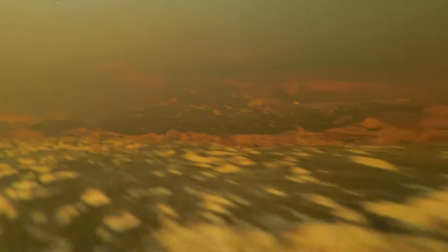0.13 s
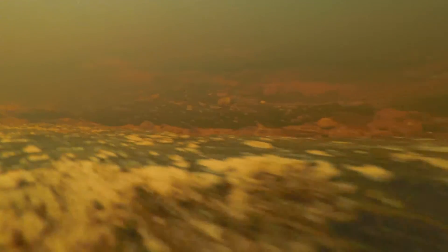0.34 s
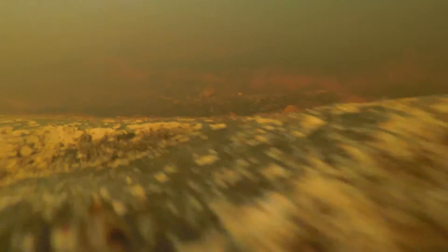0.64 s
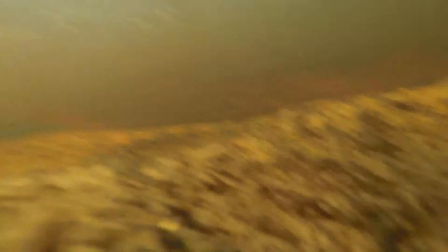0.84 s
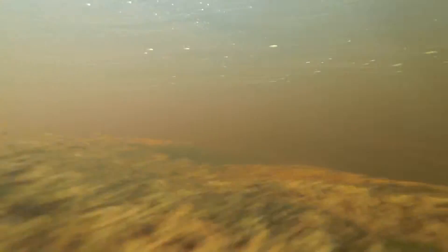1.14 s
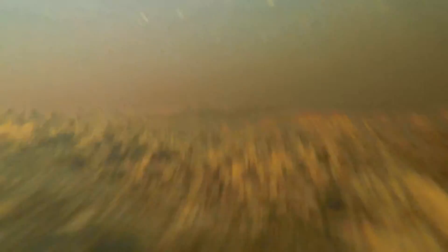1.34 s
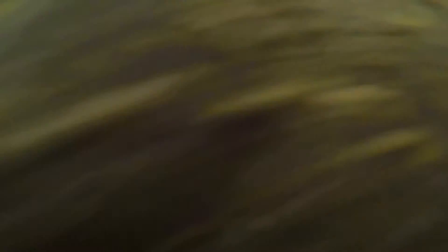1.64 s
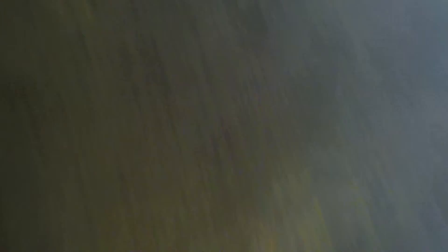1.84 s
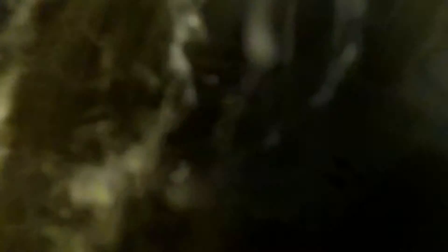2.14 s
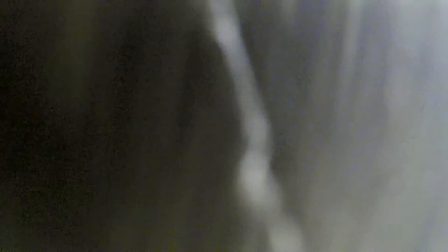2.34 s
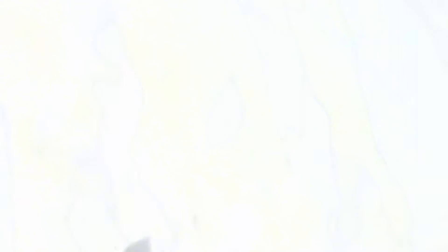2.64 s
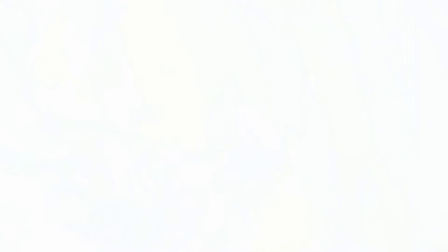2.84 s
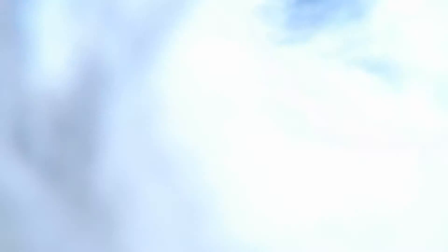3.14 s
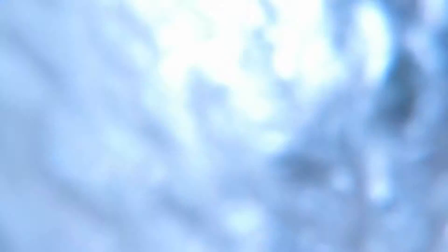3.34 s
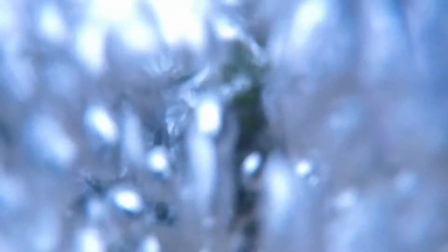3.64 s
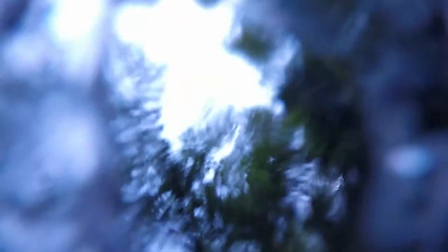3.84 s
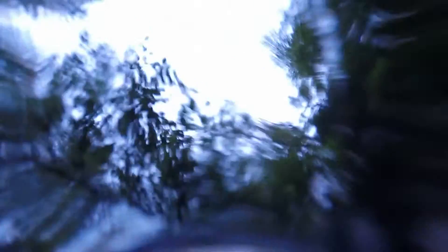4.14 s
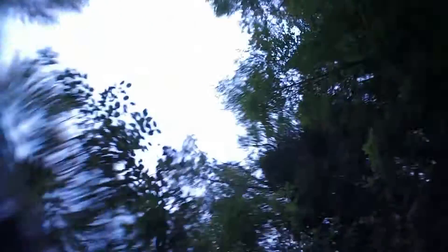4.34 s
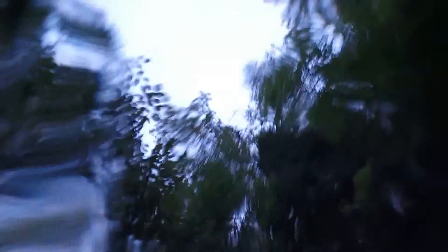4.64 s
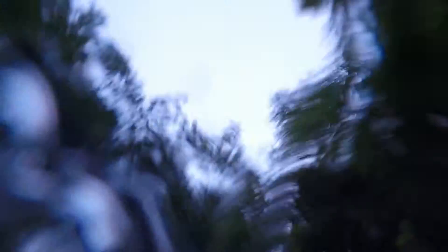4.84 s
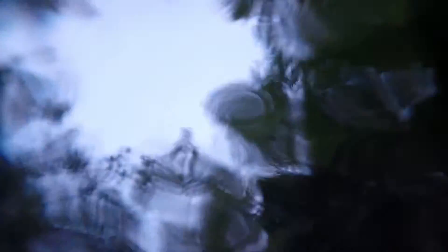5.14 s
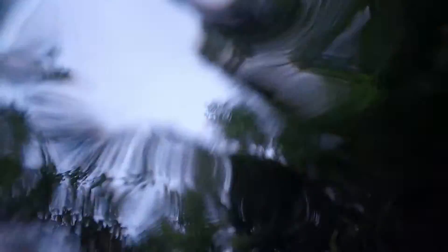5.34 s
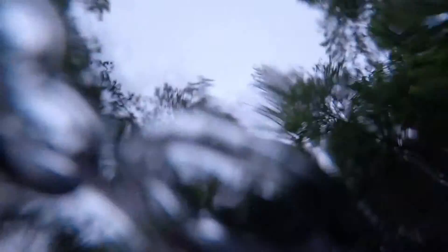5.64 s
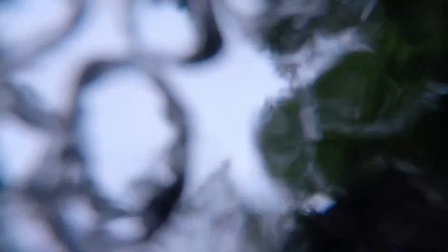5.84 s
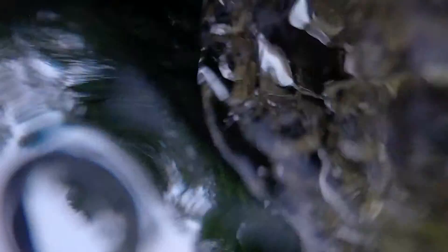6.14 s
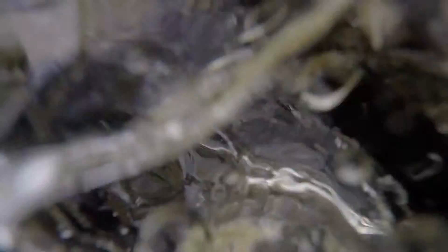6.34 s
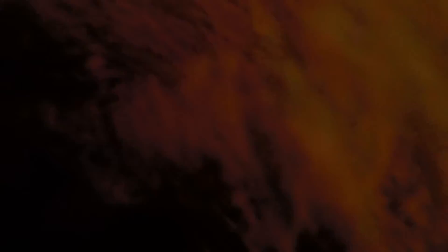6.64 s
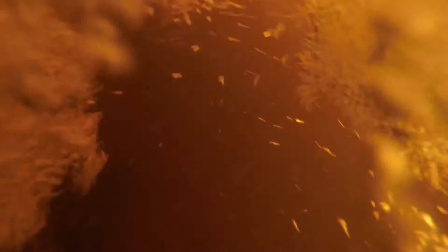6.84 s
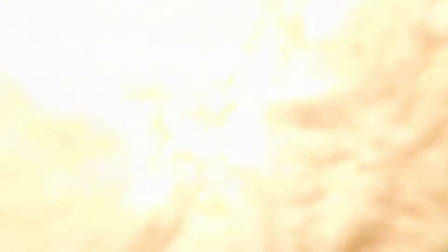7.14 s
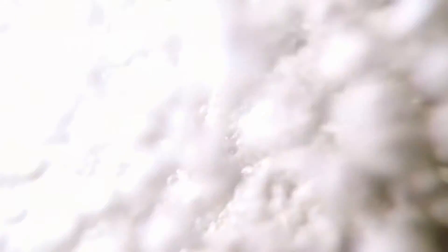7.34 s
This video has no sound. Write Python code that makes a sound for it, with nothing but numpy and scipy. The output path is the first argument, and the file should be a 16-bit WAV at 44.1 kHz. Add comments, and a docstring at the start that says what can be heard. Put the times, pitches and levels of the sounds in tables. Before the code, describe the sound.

Hard hollow knocks and plastic clacks batter a drifting waterproof case, rattling ever faster over muffled river hush, then fizzing white water and rumbling rapids.

```python
"""Stones knock the waterproof case of a camera that drifts down a river, strikes the bed and tumbles on.
Each blow mixes short, damped swings with bursts of filtered noise, and sets the mount humming.
Under the knocks lie the muffled hush of the river, made of shaped noise, and fizzing white water,
made of noise and many small bubble tones. At last comes a rapid, whose turbulence buffets the case.
The loudest blows overload the microphone."""
import sys
import numpy as np
from scipy.fft import rfft, irfft, next_fast_len
from scipy.io import wavfile
from scipy.ndimage import map_coordinates

SR = 44100
rng = np.random.default_rng(int(sys.argv[2]) if len(sys.argv) > 2 else 0)


def generate_wav(sig):
    """Save sig (samples, or channels by samples) to the path in sys.argv[1] as 16-bit PCM at SR."""
    pcm = np.round(np.clip(np.atleast_2d(sig).T, -1, 1) * 32767).astype(np.int16)
    wavfile.write(sys.argv[1], SR, pcm)


N = 330750  # length of the scene in samples

# Blows of stones on the case; each level sets one part of the blow against the same part of the others:
# start_s [s], thud_hz [Hz], thud_db [dB], clack_db [dB], crack_db [dB], hum_db of the mount [dB]
BLOWS = [(0.608, 777, -0.5, -7, -8, -16), (0.893, 332, 3.5, 1, -4, -15.5),
         (1.232, 278, -7.5, 0, -11.5, -16.5), (1.388, 269, -5, -12.5, -17.5, -14),
         (1.391, 278, -21, -7, -13.5, -11.5), (1.483, 389, 11.5, 5.5, -16, -15),
         (1.573, 328, 6.5, -1, -12.5, -21), (1.605, 206, -2.5, -26, -51, -20),
         (1.661, 800, -12, -29, -45, -17), (1.671, 231, 4, -12.5, -24, -12.5),
         (1.729, 560, -7, -13.5, -26, -13.5), (2.014, 835, -24, -9, -22, -22),
         (2.055, 222, 8.5, 9, -7.5, -21), (2.18, 324, 6.5, 3, -7.5, -27), (2.221, 546, 0.5, -6, -7, -23),
         (2.387, 275, 1.5, 1, -8.5, -23), (2.399, 307, 5, -16, -31, -17), (2.51, 278, -1.5, -3.5, -15, -17),
         (2.589, 796, 2, -13.5, -45, -26), (2.602, 580, -1.5, -9, -29, -16),
         (2.633, 640, -1.5, -20, -36, -18.5), (2.666, 307, 12, -6.5, -6, -17),
         (2.783, 655, 10.5, 7, -16.5, -28), (2.885, 515, -2, -6, -44, -44),
         (2.894, 624, -0.5, 4, -6, -27.5), (3.151, 136, -5.5, -4.5, -3, -37),
         (3.159, 560, -9, 3.5, -1.5, -45), (3.198, 644, -5, -5.5, -10.5, -29),
         (3.246, 243, -13, -4, -32, -25.5), (3.396, 320, -17.5, -7.5, -26, -27),
         (3.405, 295, 11.5, 1.5, -4, -32), (3.493, 384, 1, -8.5, -17, -8),
         (3.505, 383, -0.5, -11.5, -27, -9), (3.529, 382, 1.5, -18, -32.5, -14),
         (3.567, 330, -4.5, -18, -31, -26), (3.616, 420, 5.5, -16.5, -30.5, -16),
         (3.711, 350, 5, -10.5, -27, -6), (3.721, 490, -2.5, -21.5, -40, -23),
         (3.768, 488, -1.5, -21, -49, -10), (3.814, 348, 10.5, -10, -24, -20),
         (3.925, 544, -4, -10, -21, -0.5), (3.937, 480, 0.5, -13, -22, -14.5),
         (4.013, 830, -2, -11.5, -25, -3), (4.029, 770, -1, -16.5, -23, -15),
         (4.063, 400, 2, -18, -25, -17.5), (4.116, 720, -7.5, -13, -25, -5.5),
         (4.129, 490, -6.5, -14, -29, -6), (4.141, 730, -11, -28, -50, -11.5),
         (4.179, 400, 1, -16.5, -35, -14), (4.22, 560, -3.5, -17, -31, -10.5),
         (4.277, 554, -14, -26.5, -54, -5.5), (4.291, 660, -16, -43, -49, -13.5),
         (4.312, 398, 7.5, -14.5, -25.5, -19), (4.366, 594, -8.5, -17, -34, -15),
         (4.436, 480, -1, -1, -19, -7), (4.446, 450, 4.5, -12.5, -41, -22),
         (4.47, 556, -13.5, -19, -40, -17), (4.529, 710, 8, -13, -14.5, -11.5),
         (4.546, 830, -10.5, -16.5, -25.5, -26), (4.606, 484, 3, -10, -13.5, -12),
         (4.628, 640, -9, -18.5, -25, -11), (4.675, 477, 2.5, -16, -32, -3.5),
         (4.681, 490, -5.5, -20, -42, -27), (4.696, 704, -16, -23, -45, -9.5),
         (4.713, 830, -11.5, -26, -38, -21.5), (4.767, 470, -17.5, -38, -47, -19),
         (4.839, 398, 14, -4, -27, -18), (4.85, 676, -2.5, -20, -29, -25),
         (4.871, 210, -11, -31.5, -50, -7), (4.906, 410, -2, -18, -32.5, -12.5),
         (4.955, 545, -4.5, -19.5, -35.5, -8.5), (4.998, 580, -2, -8.5, -24.5, -17),
         (5.023, 480, -7, -13, -31.5, -8), (5.06, 306, 2.5, -13, -27.5, -11),
         (5.089, 700, -16, -27, -46, -14), (5.116, 367, -2.5, -16.5, -29.5, -7),
         (5.13, 410, -0.5, -17, -23, -33), (5.139, 546, -5, -12.5, -43, -14),
         (5.155, 477, -8.5, -18, -35, -18), (5.172, 830, -24, -18, -45, -23),
         (5.195, 700, -4.5, -15, -46, -3.5), (5.207, 560, -3, -14, -23.5, -9.5),
         (5.242, 430, -16, -34, -45, -18.5), (5.283, 595, 0.5, -6, -24.5, -11),
         (5.297, 352, -1.5, -20, -48, -17), (5.313, 600, -3, -17.5, -40.5, -11),
         (5.349, 566, -1.5, -8.5, -25, -29), (5.38, 507, -7, -17, -28, -6),
         (5.39, 400, 5.5, -14.5, -22.5, -19.5), (5.527, 323, 10.5, -1, -11, -11),
         (5.6, 360, 5, -13, -22, -23.5), (5.646, 470, -1, -12.5, -28, -15),
         (5.679, 240, -1, -18.5, -24, -12.5), (5.7, 550, -4.5, -18, -29.5, -13),
         (5.872, 125, -6, -22.5, -38.5, -18), (5.927, 330, 8.5, 0, -11, -12.5),
         (6.001, 460, -9.5, -42, -61.5, -26), (6.038, 259, 4, -5, -23, -15),
         (6.071, 313, -3.5, -5.5, -15, -12), (6.507, 250, -5, -5, -22, -19.5),
         (6.631, 296.5, 6.5, 2.5, -2, -46), (7.417, 448, -27, -20.5, -19.5, -23)]
NOTE_HZ = 215.5  # the mount's main note near the surface


def amp(db):
    """Turn decibels into a gain."""
    return 10 ** (np.asarray(db) / 20)


def unit(x):
    """Scale a sound to an rms (average strength) of 1."""
    return x / np.sqrt(np.mean(x ** 2) + 1e-20)


def curve(rows):
    """Join (time in s, value) rows by straight lines, giving one value per sample."""
    return np.interp(np.arange(N) / SR, *np.transpose(rows))


def wobble(rate):
    """Draw a smooth random curve through `rate` random points a second."""
    points = rng.standard_normal(int(N * rate / SR) + 4)
    return map_coordinates(points, [np.arange(N) * rate / SR])


def filtered(x, response):
    """Scale every frequency in x by the gain that response(hz) gives."""
    m = next_fast_len(len(x) + 4096)
    hz = np.fft.rfftfreq(m, 1 / SR) + 1  # 1 Hz up, so that a logarithm is safe
    return irfft(rfft(x, m) * response(hz), m)[:len(x)]


def coloured(x, spectrum):
    """Shape x by (pitch in Hz, relative level in dB) rows, then scale it to rms 1."""
    f, db = np.transpose(spectrum)
    return unit(filtered(x, lambda hz: amp(np.interp(np.log(hz), np.log(f), db))))


def add(track, start_s, sound):
    """Mix a sound into a track, cutting off what runs past the end."""
    part = track[round(start_s * SR):][:len(sound)]
    part += sound[:len(part)]


def bubbles(count, centre_hz, spread, cycles, size_db, activity):
    """Damped tones that first rise in pitch, of random pitch and size, crowding where activity is high."""
    chance = np.cumsum(activity) / activity.sum()
    start = np.searchsorted(chance, rng.random(count))[:, None]
    hz = np.clip(centre_hz * np.exp(spread * rng.standard_normal((count, 1))), 200, 13000)
    size = amp(size_db * np.minimum(rng.exponential(size=(count, 1)), np.pi))
    k = np.arange(SR // 64)
    age = hz * k / SR / cycles  # 1 once the bubble has lived for `cycles` cycles
    rise = 1 + 0.027 * np.minimum(age, 2)
    tone = size * np.sin(2 * np.pi * cycles * age * rise) * np.exp(-2 * age)
    return unit(np.bincount((start + k).ravel(), tone.ravel(), N + len(k))[:N])


def river():
    """The muffled hush of the current: noise shaped by the case, with a faint gurgle in it."""
    # Level of the river heard through the case: time_s [s], level_db [dB]
    hush = [(0, -45), (.58, -44.5), (.64, -58.5), (1.2, -64), (1.7, -53.5), (3.4, -57.5), (4, -68),
            (6.2, -55.5), (6.7, -49.5), (7.5, -77)]
    # Tone of the river inside the case: pitch_hz [Hz], relative level_db [dB]
    river_tone = [(24, -48.5), (40, -21), (257, -17), (392, -15), (443, -13.5), (627, -10.5), (784, -8),
                  (1060, -23.5), (1230, -18), (1780, -25), (1960, -21.5), (2170, -24), (2580, -19),
                  (4230, -34.5), (15000, -53.5)]
    gurgle = 0.1 * bubbles(count=2500, centre_hz=970, spread=0.45, cycles=10, size_db=10,
                           activity=np.ones(N))
    level = amp(curve(hush) + 0.7 * wobble(31))
    return level * coloured(rng.standard_normal(N) + gurgle, river_tone)


def churn():
    """Strength of the rushing noise: a wash, with swells that rise and drain on top, surging at random."""
    # White water washing round the case, before the surges: time_s [s], level_db [dB]
    wash = [(0, -66), (1.45, -66), (1.65, -58), (1.85, -39.5), (2.3, -39), (2.5, -49), (2.72, -52),
            (3.0, -43.5), (3.4, -42.5), (3.8, -63.5), (4.45, -66), (5.25, -55), (6.15, -72), (6.33, -45),
            (7.5, -41.5)]
    # Swells of rushing noise: a scrape before the first blow, then waves breaking over the case:
    # crest_s [s], level_db [dB], rise_s [s], fall_s [s]; rise and fall each span 20 dB
    swells = [(0.598, -37, .05, .025), (1.825, -30.5, .04, .12), (1.935, -23, .15, .07),
              (2.032, -28, .03, .07), (2.14, -29, 0.064, .06), (2.371, -34, .09, .06),
              (2.87, -29.5, .05, .11), (3.137, -35.5, .09, 0.055), (3.386, -33, 0.047, .05),
              (5.465, -34, .02, .07), (5.867, -44, .03, .04), (6.458, -40, 0.059, 0.085),
              (6.529, -14, .03, .12), (6.598, -21, .06, .05), (6.872, -31, 0.056, 0.046),
              (7.001, -29.5, 0.066, .25), (7.151, -36, .08, .12), (7.42, -36, .02, .04)]
    surge_db, surge_rate = 1.5, 45  # typical depth in dB, random points per second
    t = np.arange(N) / SR
    power = amp(curve(wash)) ** 2
    for crest_s, level_db, rise_s, fall_s in swells:
        distance = np.maximum((crest_s - t) / rise_s, (t - crest_s) / fall_s)
        power += amp(level_db - 20 * distance) ** 2
    return np.sqrt(power) * amp(surge_db * wobble(surge_rate))


def white_water():
    """Foam fizzes against the case; as it breaks harder, bubbles crowd in and the spray gets brighter."""
    # Tone of the foam: pitch_hz [Hz], relative level_db [dB]
    foam_tone = [(30, -1), (150, 1), (240, 6), (380, -9.5), (560, -8), (800, -6), (1050, -9.5),
                 (1450, -2.5), (2600, -2.5), (4300, -19.5), (5600, -17.5), (8000, -27.5), (12000, -28),
                 (15000, -54)]
    level = churn()
    fizz = bubbles(count=9000, centre_hz=2250, spread=0.7, cycles=8, size_db=6, activity=level ** 0.2)
    flutter = amp(1.3 * wobble(90))
    foam = coloured(fizz + 1.4 * rng.standard_normal(N), foam_tone) * flutter
    spray = bubbles(count=6000, centre_hz=3500, spread=0.55, cycles=8, size_db=9.5, activity=level)
    pings = bubbles(count=130, centre_hz=5380, spread=0.35, cycles=19, size_db=4, activity=level ** 0.7)
    # crowding adds to these powers, so spray grows faster than the foam and pings about equally
    return amp(1.5) * level * foam + amp(-19) * level ** 0.88 * spray + amp(-32) * level ** 0.66 * pings


def flex(t, hz, cycles):
    """A heavily damped swing of the case wall, which creeps back to rest."""
    swing = np.sin(2 * np.pi * hz * t) * np.exp(-(hz * t / cycles) ** 1.5)
    creep = t * np.exp(-t / 0.0023)
    return swing - creep * swing.sum() / creep.sum()  # pushes and pulls balance out


def burst(t, centre_hz, octaves, life, tail):
    """Crowded plastic modes shaken by a rough stone: a band of noise that lasts a few milliseconds."""
    fade = np.exp(-(t / life) ** 2) + tail * np.exp(-t / 0.0041)
    shape = (1 - np.exp(-t / 0.0012)) * fade
    band = filtered(rng.standard_normal(len(t)),
                    lambda hz: np.exp(-0.5 * (np.log2(hz / centre_hz) / octaves) ** 2))
    return unit(band * shape) * np.sqrt(np.mean(shape ** 2))


def knocks():
    """Each stone shoves the case, flexes its wall, makes the plastic clack and crack, and chatters off."""
    # Pitch of the hollow answer, which shifts as the case rolls: time_s [s], pitch_hz [Hz]
    hollow_pitch = [(2.6, 450), (3.56, 495), (4.03, 690), (4.9, 682), (6, 625)]
    out, t = np.zeros(N), np.arange(SR // 10) / SR
    for start_s, thud_hz, thud_db, clack_db, crack_db, _ in BLOWS:
        # a higher thud lasts more cycles
        cycles = 0.82 * (thud_hz / 400) ** 0.57
        thud = amp(thud_db) * flex(t, hz=thud_hz, cycles=cycles)
        # the slow shove of the whole case
        shove = amp(thud_db - 31) * flex(t, hz=102, cycles=0.21)
        # a harder clack is lower, by an octave for each 83 dB
        clack_hz = 1365 * 2 ** (-clack_db / 83)
        clack = amp(clack_db) * burst(t, centre_hz=clack_hz, octaves=0.75, life=0.003, tail=0.21)
        crack = amp(crack_db) * burst(t, centre_hz=3300, octaves=0.88, life=0.0027, tail=0.15)
        # the hollow answer is a cluster of three close modes
        scatter = np.exp(0.12 * rng.standard_normal((3, 1)))
        hollow_hz = np.interp(start_s, *np.transpose(hollow_pitch)) * scatter
        swings = np.sin(2 * np.pi * (hollow_hz * t + rng.random((3, 1)))).sum(axis=0)
        hollow_fade = amp(min(thud_db, 0) - 19 - 60 * t / 0.053)
        hollow = hollow_fade * (1 - np.exp(-t / 0.00038)) * swings
        add(out, start_s, shove + thud + clack + crack + hollow)
        # two weak rebounds follow within milliseconds, each with its own colour
        rebound_db = min(max(clack_db, thud_db - 23), -6) - 16
        for delay_s, luck in zip(0.0022 + 0.0035 * rng.random(2), rng.standard_normal(2)):
            rebound_hz = 2400 * np.exp(0.2 * luck)
            rebound = burst(t, centre_hz=rebound_hz, octaves=0.083, life=0.0018, tail=0.47)
            add(out, start_s + delay_s, amp(rebound_db) * rebound)
    return out


def gravel():
    """Grit crackles behind each blow: tiny damped tones under a quickly fading level."""
    grit_db, fade_60db_s = -26, 0.069  # level against the clack, time to fade by 60 dB
    trail, t = np.zeros(N), np.arange(SR // 4) / SR
    for start_s, _, _, clack_db, _, _ in BLOWS:
        # clacks above -14 dB stir up no more grit
        add(trail, start_s, amp(min(clack_db, -14) + grit_db - 60 * t / fade_60db_s))
    return trail * bubbles(count=5000, centre_hz=1720, spread=0.69, cycles=4, size_db=12,
                           activity=np.ones(N))


def mount():
    """The mount hums after each blow until the next contact stops it; other modes ring stronger when deep."""
    # The mount's lower note: pitch_hz [Hz], level_db against hum_db [dB], fade_60db_s [s]
    lower_note = (188, -16, 1)
    # Modes of the case: pitch_hz [Hz], level_db against the clack [dB], fade_60db_s [s]
    panel_modes = [(575, -48, .23), (1520, -40, 0.17), (2890, -54, 0.11)]
    # The mount's overtone: multiple of the main note, level_db against the blow [dB], fade_60db_s [s]
    overtone_mode = (2.05, -44, 0.27)
    # When the mount is under load: from_s [s], to_s [s]
    loaded_times = [(2.65, 3.3), (6.055, 6.4)]
    deep_note_hz, loaded_hz = 217, 241
    surface_s = 2.85  # the case lies deep until then
    shallow_share = 0.15  # strength that the modes above keep afterwards
    bend, settle_s = 0.019, 0.018  # the hum starts flat by this share, and settles at this pace
    out, t = np.zeros(N), np.arange(SR * 3 // 4) / SR
    gaps = np.diff([row[0] for row in BLOWS], append=N / SR + 1)
    low_hz, low_db, low_fade_s = lower_note
    multiple, over_db, over_fade_s = overtone_mode
    for (start_s, _, thud_db, clack_db, _, hum_db), gap in zip(BLOWS, gaps):
        u = t[t < gap + 0.005]  # rings on 5 ms into the next blow

        def mode(hz, db, fade_s):
            return amp(db - 60 * u / fade_s) * np.sin(2 * np.pi * hz * u)

        depth, note_hz = (1, deep_note_hz) if start_s < surface_s else (shallow_share, NOTE_HZ)
        if any(from_s < start_s < to_s for from_s, to_s in loaded_times):
            note_hz = loaded_hz
        panel = sum(mode(hz, db + clack_db, fade_s) for hz, db, fade_s in panel_modes)
        overtone = mode(multiple * note_hz, over_db + max(thud_db, clack_db), over_fade_s)
        lower = mode(low_hz, hum_db + low_db, low_fade_s)
        # water drag takes the first large swings quickly, then the hum lingers
        hum_fade = amp(hum_db - 8.5 - 60 * u / 0.55) + amp(hum_db - 6 - 60 * u / 0.098)
        turns = note_hz * (u - bend * settle_s * (1 - np.exp(-u / settle_s)))
        ring = hum_fade * np.sin(2 * np.pi * turns) + depth * (lower + overtone + panel)
        fade_in = 1 - np.exp(-u / 0.0039)
        fade_out = np.clip((u[-1] - u) / 0.00057, 0, 1)
        add(out, start_s, ring * fade_in * fade_out)
    return out


def short_tones():
    """Single short tones, rising in pitch: bubbles of several sizes and one weak knock."""
    # The tones: start_s [s], starting pitch_hz [Hz], level_db [dB], fade_60db_s [s]
    tones = [(1.936, 1357, -6, 0.058), (2.024, 1340, -13, 0.031), (2.853, 507, -13, 0.024),
             (3.126, 1570, -19, 0.064), (6.446, 2090, 4.5, 0.0037), (6.464, 5200, 4, 0.0022),
             (7.15, 5950, -6.5, 0.0047), (7.166, 6740, -2, 0.0035), (7.415, 1510, -8, 0.024)]
    out, t = np.zeros(N), np.arange(SR // 10) / SR
    for start_s, pitch_hz, level_db, fade_60db_s in tones:
        phase = 2 * np.pi * pitch_hz * t * (1 + 0.036 * t / fade_60db_s)
        onset = 1 - np.exp(-t / 0.0009)
        add(out, start_s, amp(level_db - 60 * t / fade_60db_s) * onset * np.sin(phase))
    return out


def drag():
    """Dragged along a rock, the mount shudders at its own note, swelling and fading once."""
    # The drag: middle_s [s], level_db [dB], half_length_s [s]
    rock_drag = (2.15, -16.5, 0.025)
    middle_s, level_db, half_length_s = rock_drag
    t = np.arange(N) / SR - middle_s
    return amp(level_db) * np.exp(-(t / half_length_s) ** 2) * np.sin(2 * np.pi * NOTE_HZ * t)


def turbulence():
    """Eddies buffet the case in lumps of low noise as it plunges into the rapid; air pockets gurgle."""
    # Tone of the buffeting: pitch_hz [Hz], relative level_db [dB]
    rumble_tone = [(20, -17), (45, 9), (100, 6), (160, 1.5), (210, 6.5), (270, -14), (400, -6),
                   (600, -13.5), (1000, -16), (2000, -27.5), (6000, -88)]
    plunge_s, plunge_db = 6.894, -19.5  # the buffeting builds up to this time and level
    build_db_per_s, ease_db_per_s = 96, 8.5
    since = np.arange(N) / SR - plunge_s
    level = amp(plunge_db + np.minimum(build_db_per_s * since, -ease_db_per_s * since))
    gurgle = bubbles(count=520, centre_hz=310, spread=0.5, cycles=5, size_db=6, activity=np.ones(N))
    lumps = amp(2.3 * wobble(30))
    buffet = coloured(rng.standard_normal(N), rumble_tone) * lumps
    return level * (buffet + 0.59 * gurgle)


def scene():
    """Everything reaches the one microphone through the case."""
    background = river() + white_water() + turbulence()
    blows = knocks() + gravel() + mount()
    return (background + blows + short_tones() + drag())[None]


def record(dry):
    """The blows overload the input, which flattens their peaks; the highest treble is then cut away."""
    flattened = dry[0] / (1 + np.abs(dry[0]) ** 8) ** (1 / 8)
    dulled = filtered(flattened, lambda hz: 1 / np.sqrt(1 + (hz / 13000) ** 12))
    return filtered(dulled, lambda hz: hz < 16000)[None]  # nothing above 16 kHz is kept


dry = scene()
out = record(dry)
generate_wav(out)
```